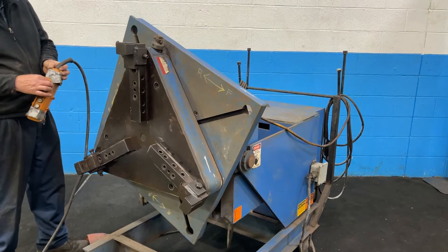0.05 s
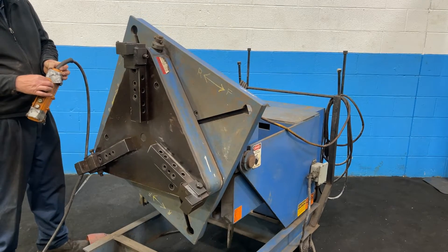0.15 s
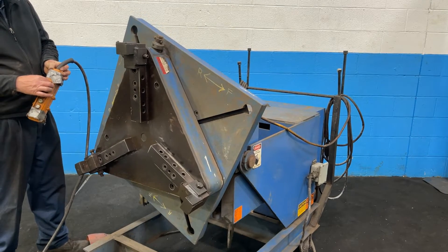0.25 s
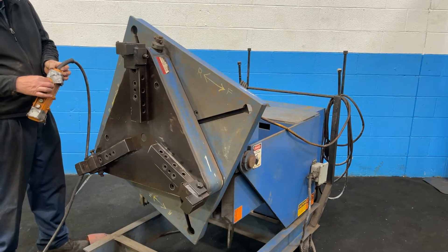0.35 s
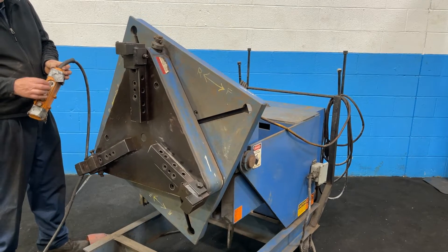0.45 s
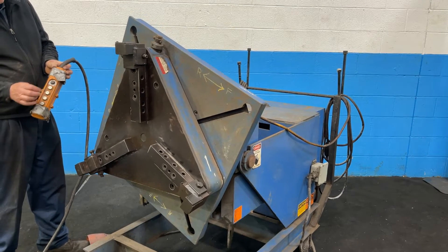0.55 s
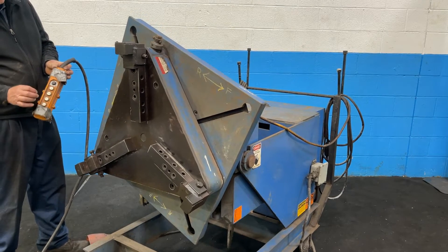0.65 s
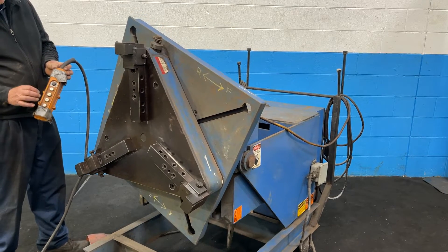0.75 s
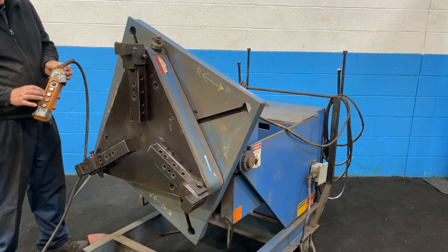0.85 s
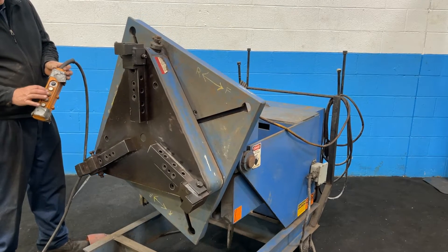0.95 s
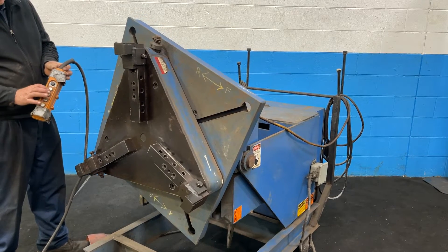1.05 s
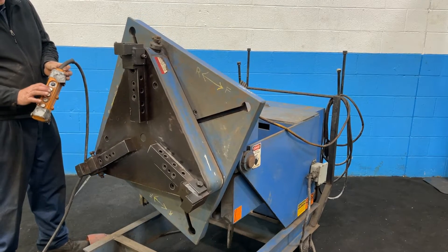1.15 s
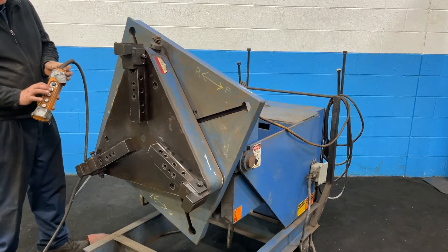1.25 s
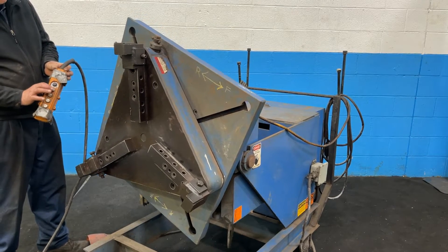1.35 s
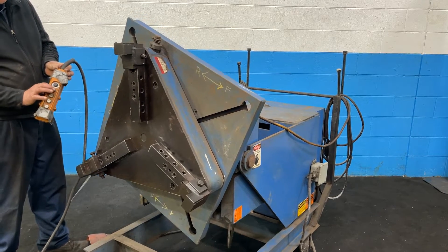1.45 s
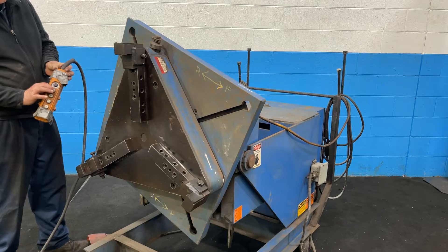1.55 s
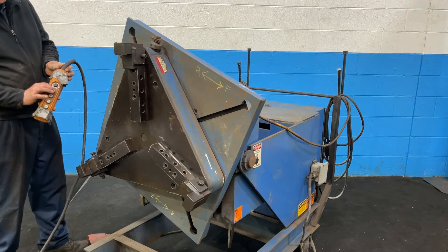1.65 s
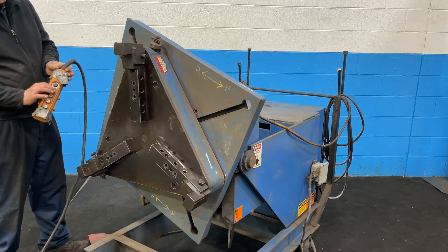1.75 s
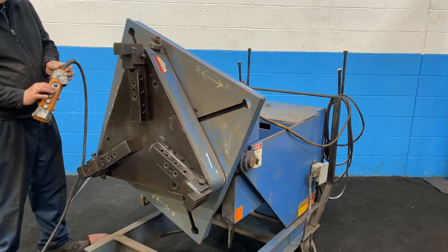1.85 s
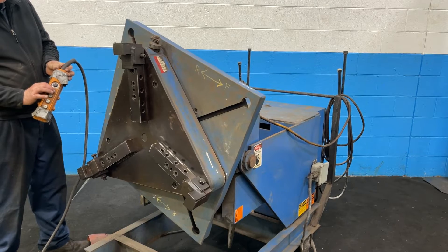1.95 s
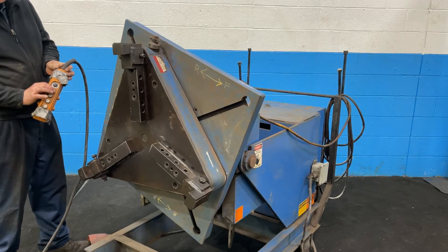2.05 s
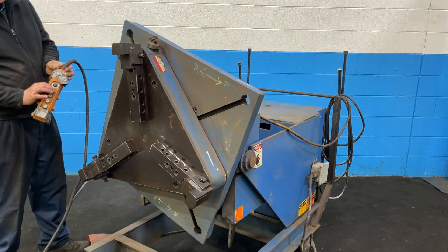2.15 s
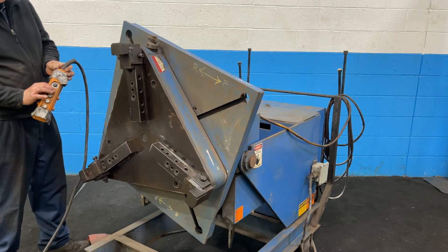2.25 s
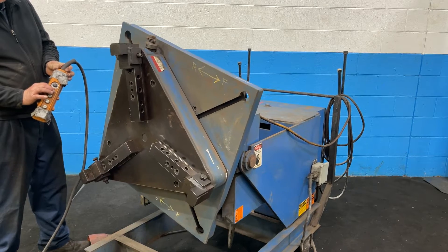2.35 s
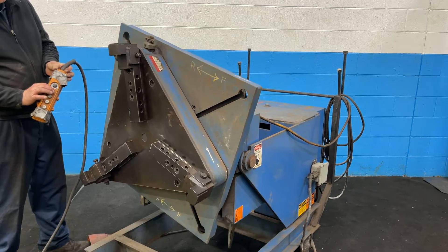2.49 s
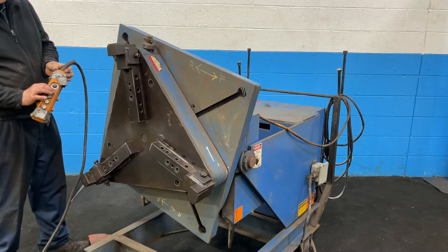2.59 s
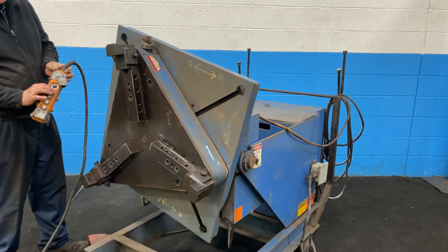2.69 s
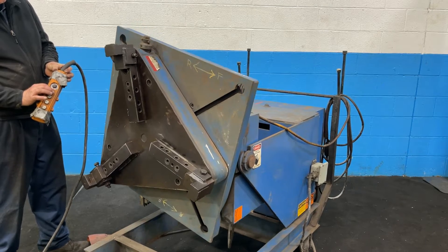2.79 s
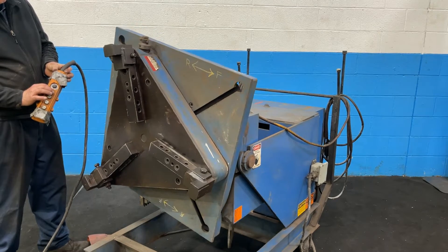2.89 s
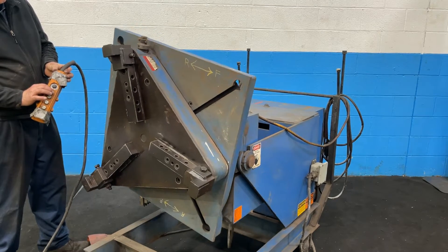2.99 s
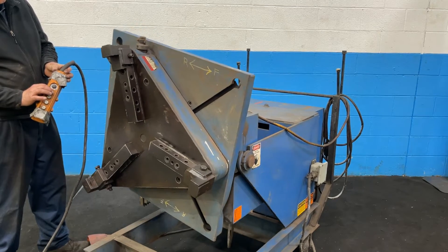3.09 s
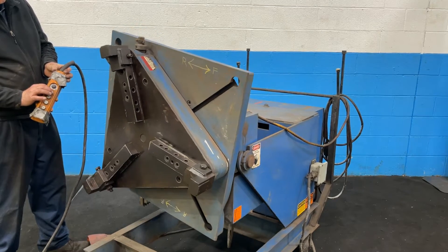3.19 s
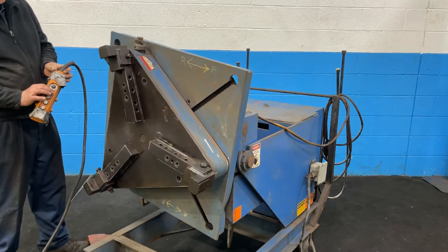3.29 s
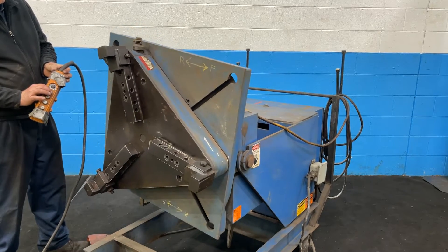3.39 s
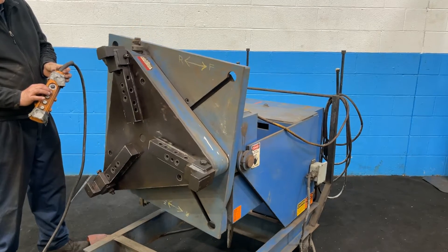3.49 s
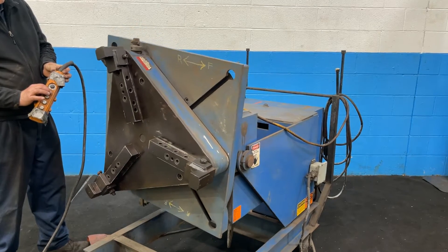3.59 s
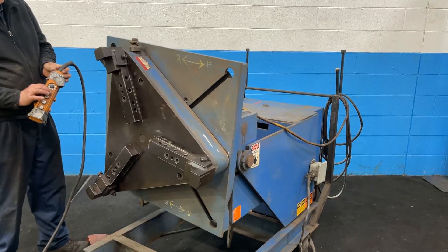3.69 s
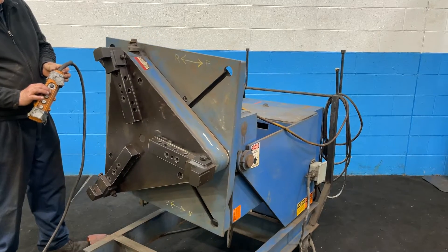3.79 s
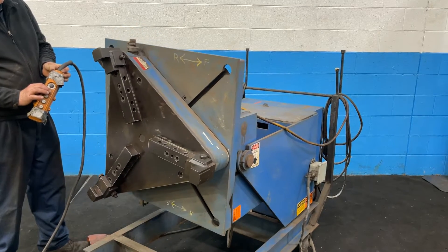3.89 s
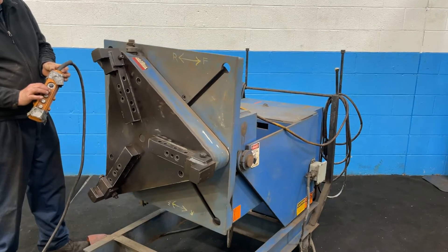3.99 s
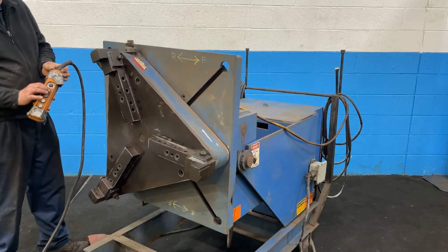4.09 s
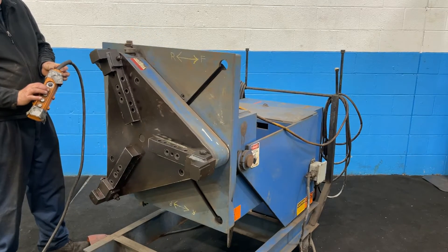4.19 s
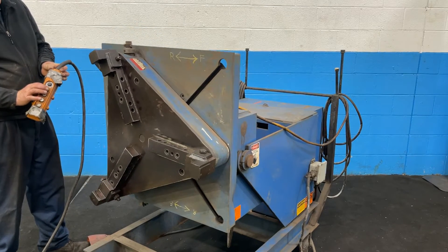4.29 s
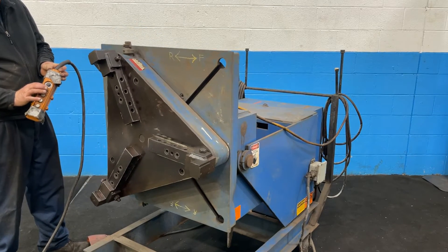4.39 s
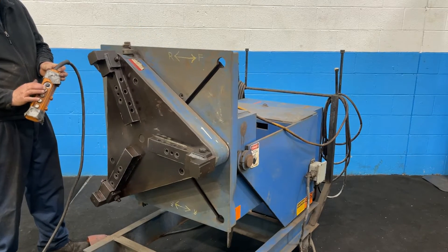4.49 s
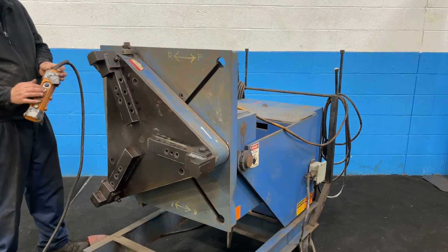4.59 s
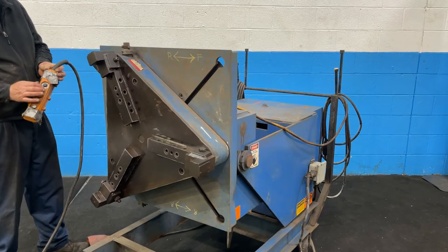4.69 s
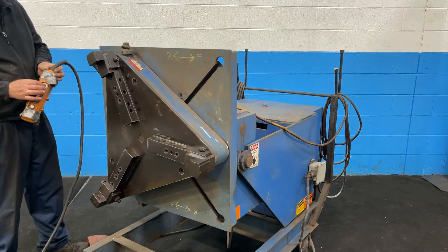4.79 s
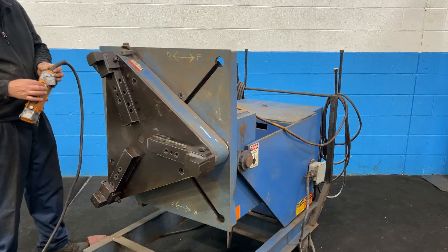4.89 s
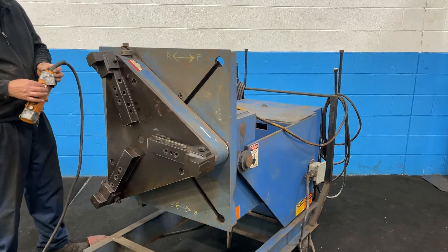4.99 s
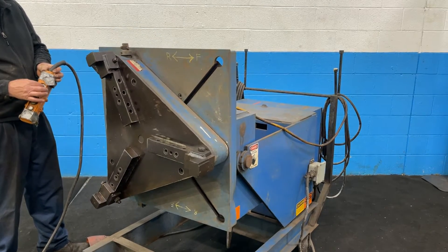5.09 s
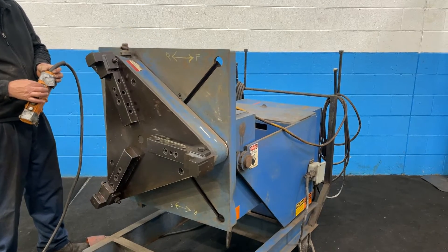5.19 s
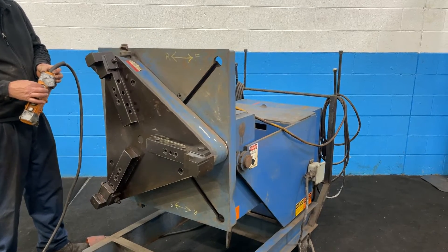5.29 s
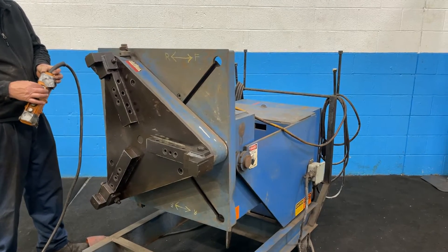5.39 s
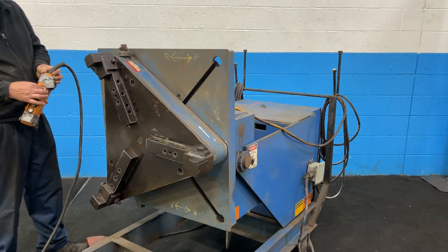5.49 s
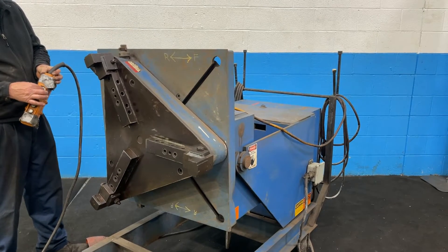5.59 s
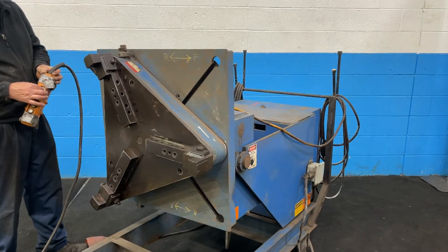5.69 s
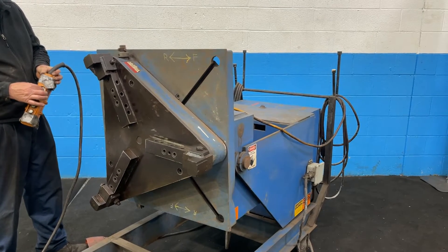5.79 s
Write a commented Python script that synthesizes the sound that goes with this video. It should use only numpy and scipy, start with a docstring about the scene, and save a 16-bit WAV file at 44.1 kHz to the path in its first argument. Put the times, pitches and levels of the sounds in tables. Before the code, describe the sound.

A steady low electrical hum near 120 hertz and slow, dry brush ticks come from a motor creeping under a heavy steel table. A soft hand scuff on the control box falls at about 0.25 s as a low room rumble briefly swells; thin, faint high squeals follow between 0.35 and 0.9 s, and a weaker one at 1.35 s. After another tiny scuff at 1.6 s the motor runs up: hum strengthens and a whine climbs smoothly until about 2.7 s, with gear growl and brush hiss. It wavers briefly, then holds a steady mid-low pitch until 4.2 s. At switch-off the hum drops, the gears give a small jolt, and the whine slides down, nearly gone by 4.9 s. The hum returns with a short wobbling surge and settles to creeping. A last faint scuff comes at 5.8 s. Close stereo, faint workshop air, short block-wall reverberation.

```python
"""A welding positioner turns its heavy steel table in a workshop, heard by a left and a right microphone.
The DC motor creeps, runs up, holds its speed, runs down after switch-off and creeps again.
Rectified mains makes it hum, the armature slots whine, the gearbox growls and the brushes tick and hiss.
A hand scuffs over the control pendant three times, and early on something gives a few thin, high squeals.
Behind it lie faint shop air, a low rumble that swells once, and the tail returned by the block walls."""
import sys
import numpy as np
from scipy import signal
from scipy.fft import rfft, irfft
from scipy.io import wavfile
from scipy.ndimage import uniform_filter1d

SR = 44100
rng = np.random.default_rng(int(sys.argv[2]) if len(sys.argv) > 2 else 0)


def unload_audio(sound):
    """Save the sound as a 16-bit wav file, at the path given as the first command line argument."""
    columns = np.transpose(np.atleast_2d(sound))
    # keep every value between -1 and 1, then stretch to whole-number steps
    steps = np.round(np.clip(columns, -1, 1) * 32767)
    wavfile.write(sys.argv[1], SR, steps.astype(np.int16))


N = 257975
T = np.arange(N) / SR  # time [s]

# gear and armature tones: (multiple of shaft rate [1], relative level [dB], left minus right [dB])
SHAFT_ORDERS = [(6.96, -14, -1), (14.91, -9, 0), (16, -14, 0), (20.8, -18, 0), (32.74, -17, 0),
                (34.8, -16, 0), (38.17, -11, 0), (40, -3, -4.5), (41.95, -14, 0), (46.9, -12, 1),
                (48, -9, 1), (60, -28, 0), (65.8, -27, 0)]
# overtones of the hum: (multiple of ripple [1], level at creeping current [dB], left minus right [dB])
HUM_OVERTONES = [(2, -40.5, -2.5), (4, -59, 0), (6, -66, -23), (7, -86, -16), (8, -64.5, -11),
                 (11, -73, 18.5), (12, -74.5, -16), (13, -78, -3), (14, -71, 2), (15, -73.5, 11)]
# rumble colour of the gearbox: (frequency [Hz], relative level [dB])
GEARBOX_COLOUR = [(40, -35), (85, -11), (180, -12), (255, 2.5), (340, -3.5), (420, -2), (520, 1),
                  (605, -13), (720, 0), (800, 7), (900, -8), (1020, -3), (1160, -15), (1550, -24.5),
                  (3000, -49)]
# resonances of motor housing and brush holders: (frequency [Hz], width [Hz], relative level [dB])
HOUSING_MODES = [(2762, 203, -7.5), (3188, 16, 0.5), (3277, 117, -5), (3654, 18, -1), (3775, 129, 5),
                 (4437, 193, -7), (5450, 160, -16), (6140, 18, -9.5), (8180, 190, -13.5), (8670, 84, -6.5),
                 (8830, 130, -17.5), (9200, 130, -14)]
# broad hiss of the sliding brushes: (frequency [Hz], relative level [dB])
HISS_COLOUR = [(600, -21), (1400, -26), (2300, -21), (3200, -17), (4200, -46), (5000, -23.5), (6000, -19.5),
               (7300, -24), (8500, -14), (9600, -19.5), (10400, -32.5), (12000, -26.5), (13000, -80)]
# air of the workshop: (frequency [Hz], relative level [dB])
AIR_COLOUR = [(25, -12.5), (80, -8.5), (160, -3.5), (400, -5.5), (600, -9.5), (770, -0.5), (1100, -19.5),
              (2000, -20), (3700, -23), (8500, -32), (11000, -89)]
# low workshop rumble: (frequency [Hz], relative level [dB])
LOW_RUMBLE_COLOUR = [(20, -55), (55, 1.5), (90, 1.5), (160, -8), (300, -9), (1000, -61.5)]
# hand on the pendant: (time [s], relative level [dB], decay [s])
HAND_SCUFFS = [(0.249, -45, 0.066), (1.58, -47, .015), (5.81, -51, 0.064)]
# colour of the scuffs: (frequency [Hz], relative level [dB])
HAND_COLOUR = [(200, -4), (1000, 3), (3000, -5.5), (5500, -12), (7000, 1), (9000, 0), (12000, -12),
               (14000, -26)]
# thin squeals: (start [s], rise [s], fade [dB/s], settled pitch [Hz], opening glide [Hz], level [dB])
THIN_SQUEALS = [(.35, .07, 170, 13250, 0, -58), (.5, .085, 85, 9210, 1100, -43),
                (.55, .1, 60, 4610, 0, -55), (.58, .07, 70, 8540, 0, -54), (1.35, .07, 8, 3755, 0, -50.5)]
# frame resonances the slot tone sweeps through: (frequency [Hz], width [Hz], relative level [dB])
FRAME_MODES = [(241, 11.5, -29), (300, 31, -30), (395, 19, -27), (479, 7.7, -19.5)]
# brief dips of the whine as it settles on its top pitch: (time [s], width [s], depth [dB])
SETTLING_DIPS = [(2.652, .016, 9.5), (2.783, 0.033, 10), (2.872, 0.03, 4)]

# motor: the operator's three commands, then the speed as slot passing rate
RUN_UP_S, SWITCH_OFF_S, RESTART_S = 1.6, 4.197, 4.935
CREEP_HZ, FULL_HZ = 71, 480.9
SLOWEST_HZ = 42  # the rotor is still turning this fast when the power returns
RAMP_S, INERTIA_S = .99, .07  # length of the eased run-up; lag of the rotor behind it
# after switch-off: a quick loss of speed, then an even run-down
BRAKE_HZ, BRAKE_S, FRICTION_HZ_PER_S = 80, .08, 515
SLOTS = 24  # per turn of the shaft

# hum and current
RIPPLE_HZ = 120.05
CREEP_HUM_DB, FULL_HUM_DB, OFF_HUM_DB = -39.5, -30.5, -51  # relative: creeping, full speed, unpowered
PULL_HUM_DB = -37  # added as amplitude by the hardest acceleration
CUT_DELAY_S, CURRENT_LAG_S = 0.046, 0.027  # the current outlasts switch-off a little and never jumps
# at the restart the current overshoots and settles; depth is a share of the running current
HUNT_DEPTH, HUNT_PERIOD_S, HUNT_DECAY_S = 3.1, 0.12, 0.07

# slot tone between resonances at full speed, its growth with speed, and its loss without current
WHINE_DB, WHINE_DB_PER_OCTAVE, WHINE_LOAD_DB = -37.5, 14, 2.5
FRAME_RING_S = 0.011  # time constant with which the resonances build up and die away

# the gearbox grows as a power of speed, then levels off above the knee
GEAR_DB, GEAR_KNEE_HZ, GEAR_STEEPNESS = -31.5, 172.4, 2.77
GEAR_FLARE_DB = 4  # most that a gear tone gains while it passes a resonance
# the teeth change flanks after switch-off
BACKLASH_DB, BACKLASH_AFTER_S, BACKLASH_WIDTH_S = 4.5, 0.091, 0.021

# brushes: relative level at full speed, growth with speed, share due to full current
BRUSH_DB, BRUSH_DB_PER_OCTAVE, BRUSH_LOAD_DB = -33, 7.5, 3
BRUSH_EASE_DB_PER_S = 0.5  # the brushes calm down during the fast run
BRUSH_LAG_S = 0.053  # they answer a change of current slowly
TICK_TOP_HZ = 5000  # ticks ring the housing below this, sliding friction above

RUMBLE_DB = -47.5
SWELL_S, SWELL_DB, SWELL_RISE_S, SWELL_DECAY_S = 0.19, 7, 0.081, 0.36  # the rumble swells once

SQUEAL_GLIDE_S, SQUEAL_LENGTH_S = .04, 0.33  # how fast a squeal finds its pitch; how long it lasts
SQUEAL_JITTER = .006  # relative unsteadiness of pitch
TOP_HZ = 13600  # upper limit of the recorder


def undb(db):
    """Decibels to gain."""
    return 10 ** (np.asarray(db) / 20)


def unit(x):
    """Scale to rms 1."""
    return x / np.sqrt(np.mean(x ** 2))


def walk(rate):
    """Smoothed random steps, about `rate` per second, scaled to rms 1."""
    hold = max(int(SR / rate), 2)
    steps = np.repeat(rng.standard_normal(N)[:N // hold + 1], hold)
    smooth = uniform_filter1d(uniform_filter1d(steps, hold), hold)
    return unit(smooth[:N])


def lag(x, seconds):
    """Follow x with that time constant."""
    keep = np.exp(-1 / (seconds * SR))
    return x[0] + signal.lfilter([1 - keep], [1, -keep], x - x[0])


def bump(s, width):
    """A smooth bell of height 1 around a moment."""
    return np.exp(-((T - s) / width) ** 2)


def response(points, modes=()):
    """Gain per frequency bin of a broad (Hz, dB) shape with resonances on top."""
    f = np.arange(4097) * SR / 8192 + 1  # the 1 Hz offset keeps the logarithm finite
    hz, db = np.transpose(points)
    power = undb(np.interp(np.log(f), np.log(hz), db)) ** 2
    for centre, width, peak_db in modes:
        power = power + (undb(peak_db) / (1 + ((f - centre) / width) ** 2)) ** 2
    return np.sqrt(power)


def ring(x, gain):
    """Pass x through the causal minimum-phase filter of that gain; white noise keeps its power."""
    cepstrum = irfft(np.log(gain))
    half = len(cepstrum) // 2
    # folding the cepstrum forward in time makes the filter causal
    cepstrum[1:half] *= 2
    cepstrum[half + 1:] = 0
    impulse = irfft(np.exp(rfft(cepstrum)))[:half]
    return signal.fftconvolve(x, impulse[None] / np.linalg.norm(impulse), axes=1)[:, :N]


def stereo_noise(side_db):
    """White noise shared by both microphones, plus a weaker part of opposite sign in each."""
    mid, side = rng.standard_normal((2, N))
    return unit(mid + undb(side_db) * side * np.array([[1], [-1]]))


def tone(phase, pan_db=0, lead=0):
    """A sine placed by level and by the phase lead [rad] of the left microphone."""
    sides = np.array([[1], [-1]]) / 2
    return np.sqrt(2) * np.sin(phase + lead * sides) * undb(pan_db * sides)


def from_left(x, lead_ms):
    """The sound reaches the right microphone a little later."""
    f = np.arange(N // 2 + 1) * SR / N
    delay = np.exp(-2j * np.pi * f * lead_ms / 1000)
    return np.array([x[0], irfft(rfft(x[1]) * delay, N)])


def echo(x, t60, side_db):
    """The dense tail that the block walls return: decaying noise of about the strength of x."""
    decay = undb(-60 * T[:SR] / t60) * (T[:SR] > .003)
    tail = stereo_noise(side_db)[:, :SR] * decay
    return signal.fftconvolve(x[None], tail / np.sqrt(np.sum(tail ** 2) / 2), axes=1)[:, :N]


def motor_speed():
    """Slot passing rate [Hz]: creep, an eased run-up, full speed, a braked run-down, and creep again."""
    ramp = np.sin(np.pi / 2 * np.clip((T - RUN_UP_S) / RAMP_S, 0, 1))
    driven = lag(CREEP_HZ + (FULL_HZ - CREEP_HZ) * ramp, INERTIA_S)
    off = np.maximum(T - SWITCH_OFF_S, 0)
    coasting = driven - BRAKE_HZ * (1 - np.exp(-off / BRAKE_S)) - FRICTION_HZ_PER_S * off
    restarted = np.interp(T, [RESTART_S, RESTART_S + INERTIA_S], [SLOWEST_HZ, CREEP_HZ])
    return np.maximum(coasting, restarted)


def motor_current(slot_hz):
    """Current relative to full speed: grows with speed and acceleration, is cut, hunts at the restart."""
    speed = np.clip((slot_hz - CREEP_HZ) / (FULL_HZ - CREEP_HZ), 0, 1)
    pull = np.maximum(np.gradient(speed), 0)
    running = undb(CREEP_HUM_DB) * (1 - speed) + undb(FULL_HUM_DB) * speed
    running = running + undb(PULL_HUM_DB) * pull / pull.max()
    age = np.maximum(T - RESTART_S, 0)
    hunt = 1 + HUNT_DEPTH * np.exp(-age / HUNT_DECAY_S) * np.sin(2 * np.pi * age / HUNT_PERIOD_S)
    powered = (T < SWITCH_OFF_S + CUT_DELAY_S) | (T > RESTART_S)
    current = lag(running * hunt * powered, CURRENT_LAG_S)
    return np.maximum(current, undb(OFF_HUM_DB)) / undb(FULL_HUM_DB)


def hum(hum_db):
    """Rectifier ripple shakes the windings; its overtones grow less than the current does."""
    phase = 2 * np.pi * RIPPLE_HZ * T
    drive_db = hum_db - hum_db[0]  # current above that of the creeping motor
    overtone_db = np.minimum(.9 * drive_db, .55 * drive_db) + .6 * walk(12)
    out = tone(phase, pan_db=-1, lead=-0.0043) * undb(hum_db - 0.54)
    for k, db, pan_db in HUM_OVERTONES:
        wander = rng.uniform(0, 2 * np.pi) + 0.32 * walk(45)
        out = out + tone(k * phase + wander, pan_db, lead=-0.1) * undb(db + overtone_db)
    return out


def whine_level(slot_hz, current):
    """Slot tone in dB: partly magnetic, it grows with speed and current and flares at frame resonances."""
    power = undb(WHINE_DB + WHINE_DB_PER_OCTAVE * np.log2(slot_hz / FULL_HZ)) ** 2
    for hz, width, db in FRAME_MODES:
        power = power + (undb(db) / (1 + ((slot_hz - hz) / width) ** 2)) ** 2
    dips_db = sum(depth_db * bump(s, width) for s, width, depth_db in SETTLING_DIPS)
    level_db = 20 * np.log10(lag(np.sqrt(power), FRAME_RING_S))
    return level_db + WHINE_LOAD_DB * (current - 1) - dips_db


def whine(slot_hz, slot_turns, whine_db, gear_db):
    """The slot tone, and gear tones that flutter and fade between the resonances of the gearbox."""
    phase = 2 * np.pi * slot_turns
    out = tone(phase, pan_db=2.0, lead=-0.37) * undb(whine_db + 0.23 * walk(8.9))
    speed = slot_hz / slot_hz.max()
    for k, db, pan_db in SHAFT_ORDERS:
        body_db = np.interp(k * slot_hz / SLOTS, *np.transpose(GEARBOX_COLOUR))
        body_db = np.minimum(body_db - body_db[speed.argmax()], GEAR_FLARE_DB)
        flutter = undb(db - .5 + gear_db + body_db + 2.5 * walk(15)) * speed
        wander = 0.65 * walk(15) + rng.uniform(0, 2 * np.pi)
        out = out + tone(phase * k / SLOTS + wander, pan_db, lead=0.78) * flutter
    # below top speed the room tail blurs the gliding tones; at top speed it merges with them
    blur = np.clip((1 - speed) / .1, 0, 1) * .7
    tail = echo(out.mean(axis=0) * blur, t60=.4, side_db=-12)
    return out * np.sqrt(1 - blur ** 2) + tail


def gear_level(slot_hz):
    """Gear noise in dB: it rises with speed and jolts when the table starts to push the motor."""
    by_speed = -20 * np.log10(1 + (GEAR_KNEE_HZ / slot_hz) ** GEAR_STEEPNESS)
    return GEAR_DB + by_speed + BACKLASH_DB * bump(SWITCH_OFF_S + BACKLASH_AFTER_S, BACKLASH_WIDTH_S)


def gearbox(slot_hz, slot_turns, gear_db):
    """Rolling teeth rumble in the steel base; uneven meshing spreads a growl around the slot tone."""
    rub = stereo_noise(side_db=-9.0) * undb(1.4 * walk(45))
    rumble = from_left(ring(rub, response(GEARBOX_COLOUR)), lead_ms=0.043)
    phase = 2 * np.pi * slot_turns
    growl = unit(walk(170) * np.cos(phase) + walk(170) * np.sin(phase))
    growl = growl * np.sqrt(slot_hz / slot_hz.max())
    return (rumble * undb(0.58) + growl * undb(-6.5)) * undb(gear_db)


def brush_level(slot_hz, current):
    """Brush noise in dB: it rises with speed and current, and eases while the motor runs fast."""
    speed = slot_hz / FULL_HZ
    mid_run = (RUN_UP_S + RAMP_S + SWITCH_OFF_S) / 2
    ease = BRUSH_EASE_DB_PER_S * (T - mid_run) * speed ** 2
    load = BRUSH_LOAD_DB * (lag(current, BRUSH_LAG_S) - 1)
    return BRUSH_DB + BRUSH_DB_PER_OCTAVE * np.log2(speed) + load - ease


def brushes(slot_hz, slot_turns, brush_db):
    """Each commutator bar gives an uneven tick that rings the housing; between bars the brushes hiss."""
    bar = slot_turns.astype(int)
    strength = undb(3.5 * np.clip(rng.standard_normal(N), -2, 1.2))[bar]
    since = slot_turns % 1 / slot_hz  # seconds since the last bar
    tick = strength * np.exp(-since / 0.0011) / np.sqrt(slot_hz)  # the same power at any speed
    contact = unit(unit(tick) * stereo_noise(side_db=-4) + 0.66 * stereo_noise(side_db=-7.5))
    contact = unit(contact + undb(-2) * echo(contact.mean(axis=0), t60=0.4, side_db=-6.5))
    sliding = unit(contact + 0.81 * stereo_noise(side_db=-6)) * undb(0.46 * walk(24.83))
    # ticks reach the lower modes, sliding friction the upper ones
    low_modes = [m for m in HOUSING_MODES if m[0] < TICK_TOP_HZ]
    high_modes = [m for m in HOUSING_MODES if m[0] >= TICK_TOP_HZ]
    floor = [(100, -70), (14000, -76.0)]  # (frequency [Hz], relative level [dB])
    knock = ring(contact * undb(1.07 * walk(40)), response(floor, low_modes))
    hiss = ring(sliding, response(HISS_COLOUR, high_modes))
    return from_left(knock * undb(1.36) + hiss * undb(-1.5), lead_ms=0.019) * undb(brush_db)


def background():
    """Faint workshop air over a low rumble, both filtered noise; the rumble swells once."""
    age = np.maximum(T - SWELL_S, 0)
    swell = np.minimum(age / SWELL_RISE_S, np.exp((SWELL_RISE_S - age) / SWELL_DECAY_S))
    rumble_db = RUMBLE_DB + SWELL_DB * swell
    air = ring(stereo_noise(side_db=-4), response(AIR_COLOUR)) * undb(-47.0 + 0.18 * walk(2.36))
    rumble = ring(stereo_noise(side_db=-35), response(LOW_RUMBLE_COLOUR))
    return air + rumble * undb(rumble_db + 1.2 * walk(5))


def pendant():
    """Short soft scuffs of a hand on the control box: rough noise with a quick rise and a decay."""
    swell = 0
    for s, db, decay in HAND_SCUFFS:
        age = np.maximum(T - s, 0)
        swell = swell + undb(db + 2) * np.minimum(age / .012, 1) * np.exp(-age / decay)
    rub = stereo_noise(side_db=-3.5) * swell * undb(1.9 * walk(200))
    return ring(rub, response(HAND_COLOUR))


def squeal():
    """Thin unsteady sines that swell, hold or slide onto their pitch and fade, with a room tail."""
    out = 0
    for s, rise, fade_db, hz, glide_hz, db in THIN_SQUEALS:
        age = np.maximum(T - s, 0)
        pitch = hz + glide_hz * np.exp(-age / SQUEAL_GLIDE_S)
        phase = 2 * np.pi * np.cumsum(pitch * (1 + SQUEAL_JITTER * walk(700))) / SR
        swell = np.clip(np.minimum(age, SQUEAL_LENGTH_S - age) / rise, 0, 1) ** 2
        level_db = db - fade_db * np.maximum(age - rise, 0) + 2 * walk(60.5)
        out = out + np.sin(phase) * undb(level_db) * swell
    return out + undb(-3) * echo(out, t60=.35, side_db=-1)


def scene():
    """One motor speed drives whine, gears and brushes; its current sets the hum."""
    slot_hz = motor_speed()
    slot_turns = np.cumsum(slot_hz) / SR  # slots passed so far
    current = motor_current(slot_hz)
    hum_db = FULL_HUM_DB + 20 * np.log10(current)
    whine_db = whine_level(slot_hz, current)
    gear_db = gear_level(slot_hz)
    brush_db = brush_level(slot_hz, current)
    drive = hum(hum_db) + whine(slot_hz, slot_turns, whine_db, gear_db)
    drive = drive + gearbox(slot_hz, slot_turns, gear_db) + brushes(slot_hz, slot_turns, brush_db)
    return drive + background() + pendant() + squeal()


def record(dry):
    """The recorder cuts the top with a steep low-pass."""
    low_pass = signal.ellip(8, .1, 60, TOP_HZ, fs=SR, output="sos")
    return signal.sosfiltfilt(low_pass, dry)


dry = scene()
out = record(dry)
unload_audio(out)
```